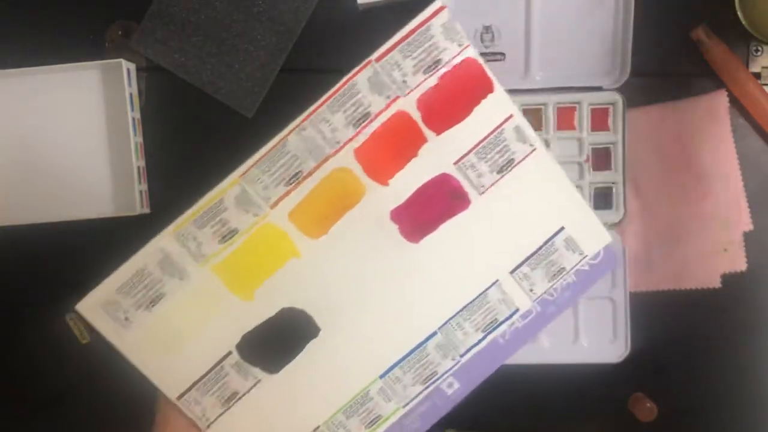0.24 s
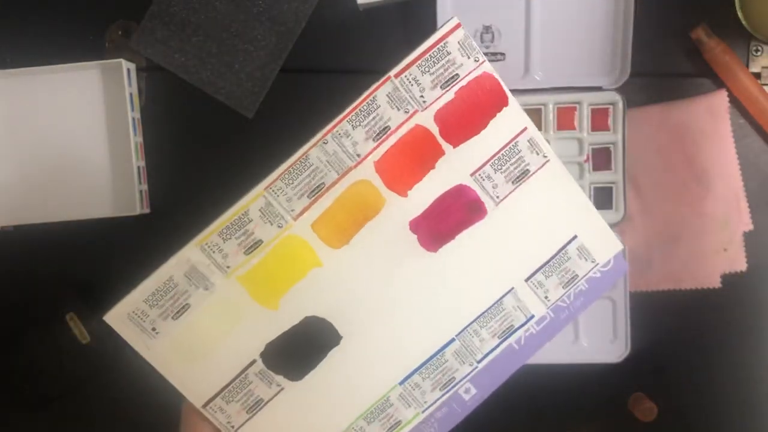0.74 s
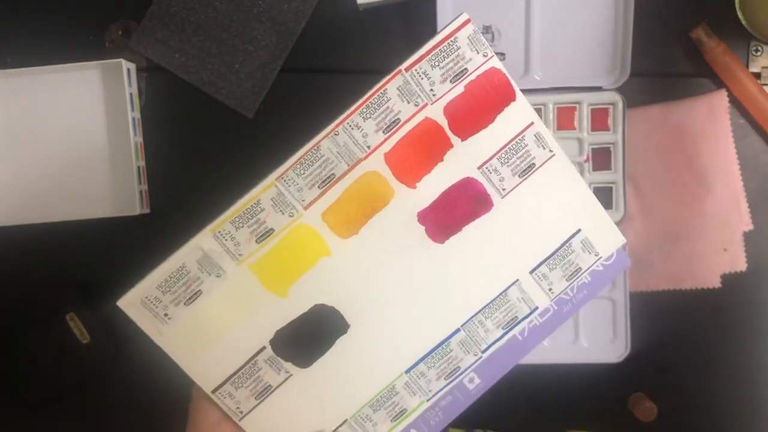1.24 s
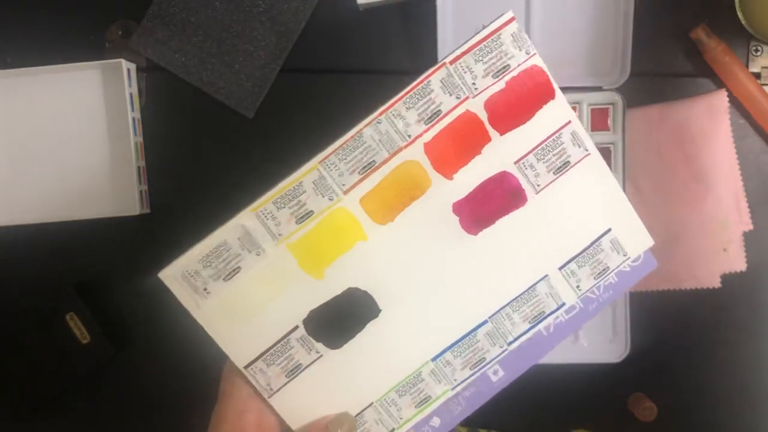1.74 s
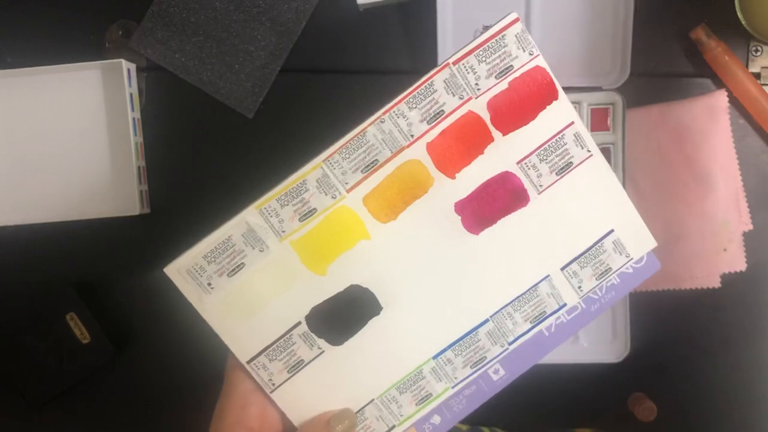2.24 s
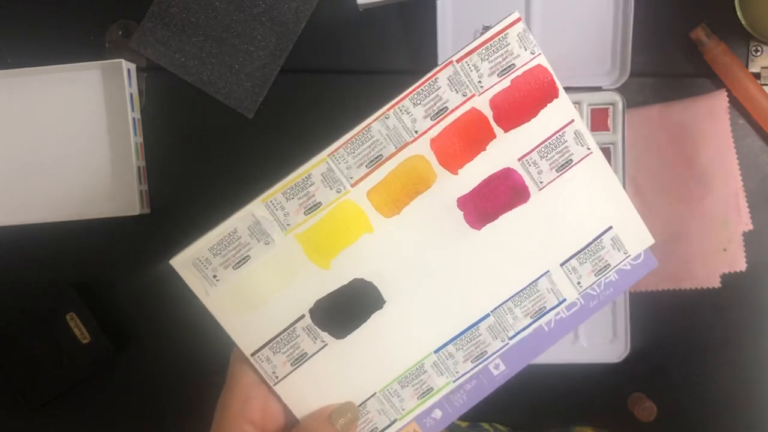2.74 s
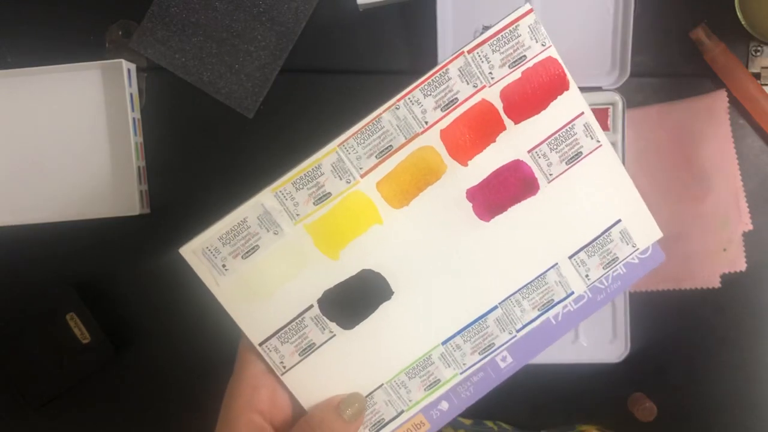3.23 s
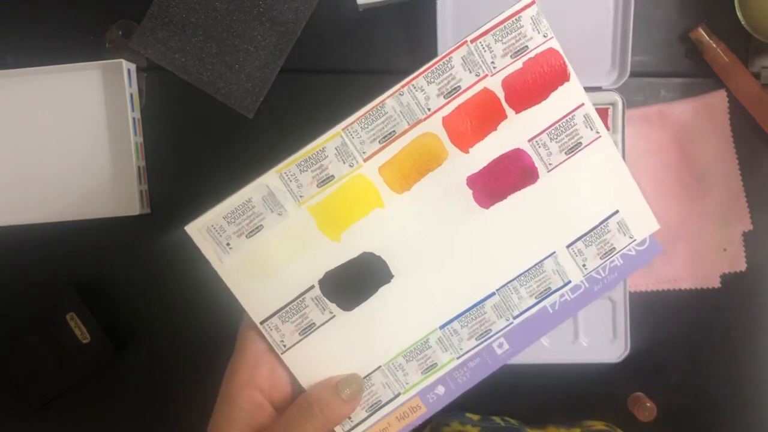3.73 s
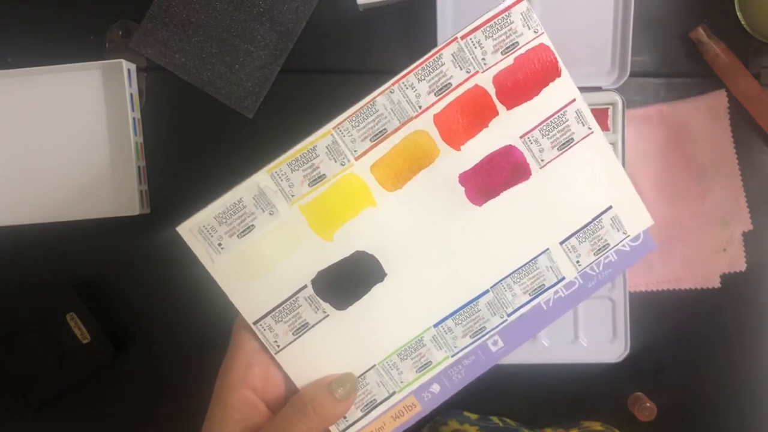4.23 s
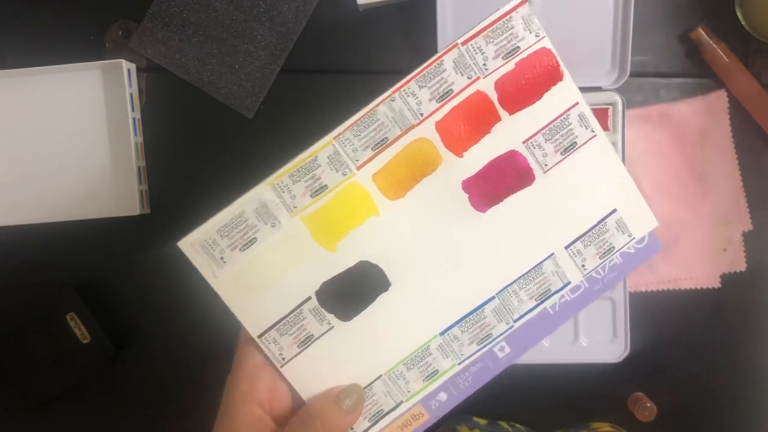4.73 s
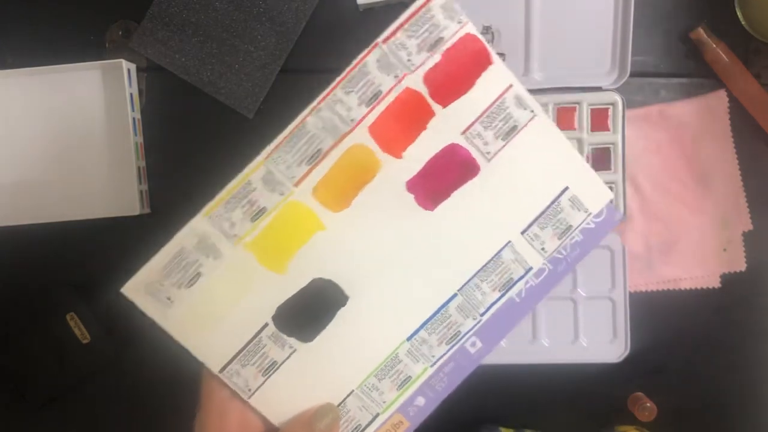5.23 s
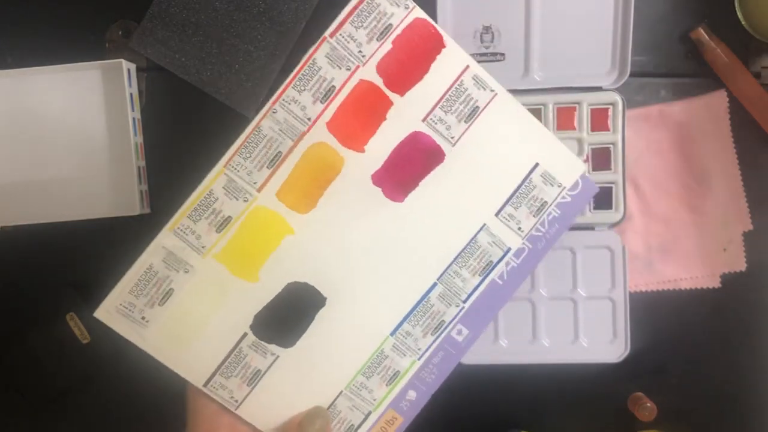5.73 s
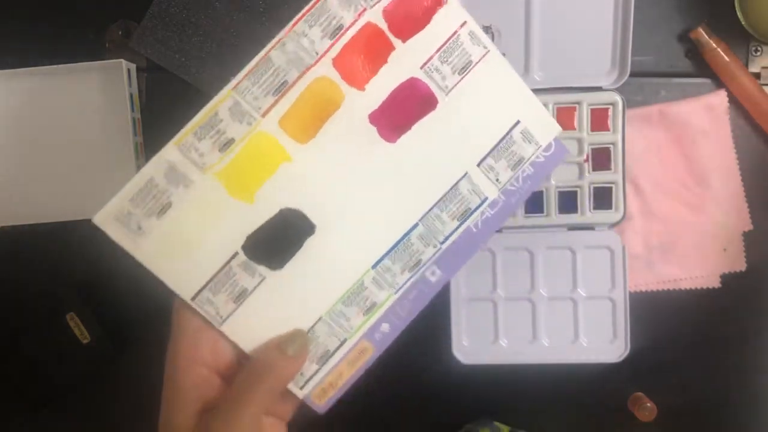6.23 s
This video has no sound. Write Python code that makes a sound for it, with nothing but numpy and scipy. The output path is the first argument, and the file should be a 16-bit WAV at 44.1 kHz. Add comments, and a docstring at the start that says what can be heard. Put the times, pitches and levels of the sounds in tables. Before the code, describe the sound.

Close up in a small, quiet room, a brush clinks sharply against a glass water jar, twice in quick succession. Gentle plips and little splashes carry on as it swirls in the water. Another clink rings out, then a further pair, and a brief bit of stirring dies away. Underneath are a low rumble, an appliance hum and the very faint rustle of a hand-held card.

```python
"""Bright glass clinks and small watery plips: a paintbrush is rinsed in a jar of water on a desk.
The ferrule strikes the glass, which rings and jolts the desk; the stirred water sheds small
ringing bubbles and spits fine ticks of spray. A sheet of card rustles faintly in the other hand.
It all sits close up in a small quiet room, over a low rumble and hum."""
import sys
import numpy as np
from scipy import signal
from scipy.fft import rfft, irfft
from scipy.io import wavfile

SR = 44100
rng = np.random.default_rng(int(sys.argv[2]) if len(sys.argv) > 2 else 0)


def wrap_up_sound(samples):
    """Save the sound to the file named by the first command line argument, as 16-bit audio."""
    columns = np.atleast_2d(samples).T
    # keep every value between -1 and 1, then stretch to whole-number steps
    tamed = np.clip(columns, -1, 1)
    steps = np.round(tamed * 32767).astype(np.int16)
    wavfile.write(sys.argv[1], SR, steps)


N = 285194
TIME = np.arange(N) / SR
AGE = TIME[:SR]  # the first second of a sound

# The jar's ring; close pairs beat. Each row: pitch in Hz, decay (t60) in seconds,
# relative level in dB when struck on side 0, the same on side 1.
GLASS_MODES = [(3125, .42, -46, -30), (3152, .35, -22, -37), (3175, .30, -34, -54), (3205, .36, -27, -58),
               (4080, .28, -55, -60), (4240, .25, -56, -54), (4350, .28, -54, -60), (5148, .38, -66, -43),
               (5188, .44, -70, -41), (5480, .38, -41, -60), (5547, .28, -49, -60), (5645, .20, -56, -48),
               (5970, .06, -29, -32), (6037, .24, -54, -29), (6063, .34, -43, -37), (6125, .28, -48, -54),
               (6590, .25, -57, -55), (7590, .14, -52, -46), (7830, .02, -44, -13), (7875, .25, -60, -55),
               (9680, .16, -62, -45), (10121, .26, -68, -44), (10428, .32, -44, -62),
               (10480, .03, -29, -38), (11428, .28, -74, -43), (11618, .10, -45, -52),
               (12069, .24, -72, -36), (12440, .23, -44, -54), (13052, .18, -68, -32),
               (14240, .18, -55, -48), (15500, .2, -70, -44)]
# Ferrule hits. Each row: start in seconds, side 0 or 1, ring gain in dB, favoured pitch in Hz,
# its lift in dB, treble gain in dB, crack gain in dB, thud gain in dB, thud centre in Hz.
FERRULE_HITS = [(0.4191, 0, -48.5, 3400, 17, -6, -54.5, -85.5, 300),
                (0.5978, 0, -2.5, 2970, 4, 4, -19, -43, 151), (0.9493, 0, -48, 5800, 21, 1, -58, -84, 300),
                (1.0704, 0, -4, 6260, 10.5, -6.5, -16, -25.5, 237),
                (2.768, 0, -40, 3200, 5, -4, -73, -79.5, 302),
                (3.1713, 0, -26.5, 6000, 18, 2.5, -23.5, -39.5, 157),
                (4.008, 1, 0, 7630, -2, 6, -14.5, -35, 358),
                (4.349, 1, -5, 6380, 10, -8, -23.5, -41.5, 150),
                (4.8031, 1, -33.5, 5170, 20, -11.5, -53, -88, 297)]
# The desk's ring. Each row: pitch in Hz, decay (t60) in seconds, relative level in dB.
WOOD_MODES = [(96, .5, -10), (142, .25, -13), (228, .14, -11), (285, .12, -4), (335, .14, -4),
              (395, .15, -1), (460, .12, -7), (610, .3, -9), (815, .14, -7), (1520, .45, -18),
              (1740, .12, -2)]
# The loudest bubbles. Each row: start in seconds, pitch in Hz, level in dB.
LOUD_BUBBLES = [(0.7266, 2040, -38), (0.7934, 2146, -40), (.8947, 2120, -39), (1.0528, 1784, -37),
                (1.158, 1583, -29.5), (1.3936, 5560, -43), (1.4564, 2600, -37), (1.5331, 632, -51),
                (1.7117, 1721, -36), (1.854, 3000, -42.5), (1.912, 5340, -40.5), (2.0758, 1914, -31.5),
                (2.2281, 1525, -34.5), (2.467, 1585, -33.5), (2.6398, 1695, -43), (2.796, 1660, -40.5),
                (2.869, 1510, -49), (2.9067, 1860, -41.5), (3.0005, 6260, -33), (3.0212, 1790, -42),
                (3.1418, 1630, -40.5), (3.1726, 1632, -29), (4.4845, 1680, -46), (4.7411, 2050, -39),
                (4.7578, 1540, -33.5), (4.824, 1430, -41), (4.8776, 1467, -36), (4.969, 5120, -39.5),
                (4.984, 1915, -40), (5.0559, 1910, -32), (5.3192, 1590, -44), (5.358, 3980, -40)]
# Bristles breaking the surface. Each row: start in seconds, relative level in dB.
BRISTLE_SPLASHES = [(0.7966, -51), (0.8823, -44), (0.8927, -45), (1.3924, -46), (1.4415, -43),
                    (1.4555, -51), (1.913, -43), (2.0733, -41), (2.1503, -44.5), (2.4616, -42.5),
                    (2.71, -46.5), (2.7649, -46.5), (4.7559, -42.5), (4.823, -37.5), (4.8787, -43),
                    (4.9683, -51.5), (5.0571, -39.5), (5.346, -45)]
# The sharpest spray. Each row: start in seconds, relative level in dB, centre in Hz.
SPRAY_TICKS = [(0.8827, -39, 10340), (1.488, -43, 11350), (2.0734, -36.5, 7310), (2.2298, -43.5, 14100),
               (2.336, -45, 13400), (2.3938, -47.5, 9100), (3.1351, -45, 8810), (3.978, -53.5, 7900),
               (4.8878, -41, 8400), (4.9853, -41.5, 9300), (5.055, -42.5, 8000)]
# Spells of stirring. Each row: start in seconds, end in seconds, base level of the fizz in dB.
STIR_SPELLS = [(0.722, 1.0, -47), (1.357, 2.04, -51), (2.059, 3.14, -47), (4.754, 5.14, -46.5),
               (5.279, 5.46, -42.5), (5.464, 5.68, -56)]
# The card shifting in the hand. Each row: middle in seconds, length in seconds, level in dB.
CARD_SHIFTS = [(0.082, 1, -64), (2.13, 0.9, -65), (3.783, 0.16, -70), (5.803, .15, -66.5)]
# Taps and scuffs of the card. Each row: start in seconds, length in seconds, level in dB,
# centre in Hz, width in octaves.
CARD_SCUFFS = [(0.037, 0.012, -55.5, 447, 3), (2.042, 0.21, -72.5, 930, 0.25), (5.686, 0.2, -70, 4380, 1.8),
               (6.439, 0.071, -44.5, 8700, 0.15)]
# An appliance's drone. Each row: centre in Hz, width in Hz, level in dB.
HUM_BANDS = [(53.7, 21, -59.5), (91.6, 3.6, -62.5), (122, 5.6, -66.5)]
# EQ curves for the noise layers. Each row: frequency in Hz, relative level in dB.
CRACK_EQ = [(300, -35.5), (1200, -25), (2000, -9), (2900, 5), (4500, 0.5), (6500, 0), (9000, -2.5),
            (12000, -5.5), (15500, -5.5), (17000, -20.5)]  # metal meeting glass
THUD_EQ = [(40, -11), (95, 3.5), (180, -4), (330, -1), (500, -1), (650, -2), (1100, -8), (1700, -12.5),
           (3000, -24.5), (8000, -56)]  # the jolted desk
SPLASH_EQ = [(700, -18.5), (1500, -4), (2600, 2.5), (4200, -1.5), (6000, -13.5), (9000, -25), (16000, -29)]  # the water's surface
RUSTLE_EQ = [(150, -0.5), (400, 2.5), (850, -1), (1400, -9), (4000, -17.5), (8000, -35.5), (16000, -33)]  # the sheet of card
AIR_EQ = [(15, -36), (25, -15.5), (70, -4.5), (105, -4.5), (137, -5.5), (195, -13), (344, -17), (531, -25),
          (818, -24.5), (1260, -37.5), (2760, -34), (3160, -35), (11900, -45.5), (14800, -42),
          (16000, -59.5)]  # the room's rumble


def clinks():
    """Each ferrule hit rings the glass, cracks and jolts the desk; the contact point picks the modes."""
    tones, blows = np.zeros((2, N))
    hz, t60, side0_db, side1_db = np.transpose(GLASS_MODES)
    treble_hz = 7000
    for start, side, ring_db, favoured_hz, lift_db, treble_db, crack_db, thud_db, thud_hz in FERRULE_HITS:
        mode_db = (side1_db if side else side0_db) + ring_db
        mode_db += lift_db * bump(hz, favoured_hz, octaves=.11) + treble_db * (hz > treble_hz)
        # the ring builds while the ferrule presses on the glass, then wavers as it fades
        add(tones, start, ring(hz, t60, mode_db, waver_hz=14) * (1 - fade(t60=.0089)))
        lift = lambda f: .6 * lift_db * bump(f, favoured_hz, octaves=.06)
        shelf = lambda f: 1.3 * treble_db * (f > treble_hz)
        crack = noise(lambda f: colour(CRACK_EQ)(f) + lift(f) + shelf(f), SR) * fade(t60=.017)
        add(blows, start, undb(crack_db) * crack + undb(thud_db) * desk_thud(thud_hz))
    return tones, blows


def desk_thud(centre_hz, lift_db=10):
    """The desk answers more slowly than the glass, with a woody ring and a dull puff of noise."""
    hz, t60, db = np.transpose(WOOD_MODES)
    wood = ring(hz, t60, db + lift_db * (bump(hz, centre_hz, octaves=.53) - 1))
    dull = noise(lambda f: colour(THUD_EQ)(f) + lift_db * bump(f, centre_hz, octaves=.34), SR)
    return (wood + undb(-3) * dull * fade(t60=.14)) * (1 - fade(t60=.076))


def water():
    """The loudest bubbles close with a faint splash; the bristles splash louder; spray ticks between them."""
    out = np.zeros(N)
    for start, hz, db in LOUD_BUBBLES:
        add(out, start, undb(db) * plip(hz))
        add(out, start, undb(db - 21) * splash())
    for start, db in BRISTLE_SPLASHES:
        add(out, start, undb(db - 2) * splash())
    for start, db, hz in SPRAY_TICKS:
        add(out, start, undb(db - 1) * tick(hz))
    return out


def bubble_trails(trail_db=-8, spread_db=4, low_hz=2000, high_hz=4600, trail_s=.028, count=4):
    """Each bristle splash sheds a short trail of tiny bubbles."""
    out = np.zeros(N)
    for start, db in BRISTLE_SPLASHES:
        for when, height, strength in rng.random((count, 3)):
            hz = low_hz * (high_hz / low_hz) ** height
            gain = undb(db + trail_db + spread_db * (2 * strength - 1))
            add(out, start + trail_s * when ** 2, gain * bubble(hz))
    return out


def stirring(low_hz=1644, high_hz=3900, fall_db_per_octave=3, spread_db=.5, spray_hz=9500, spray_db=-8.5):
    """The moving brush throws up a fizz of bubbles and droplets; low bubbles are commoner and louder."""
    out = np.zeros(N)
    for start, end, db in STIR_SPELLS:
        for when, height, strength in scatter(start, end, per_s=14):
            octaves = np.log2(high_hz / low_hz) * height ** 2
            cluster = plip(low_hz * 2 ** octaves, shed_db=-1)
            add(out, when, undb(db + spread_db * strength - fall_db_per_octave * octaves) * cluster)
        for when, height, strength in scatter(start, end, per_s=6.2):
            droplet = tick(spray_hz * 2 ** (height - .5))
            add(out, when, undb(db + spray_db + spread_db * strength) * droplet)
    return out


def plip(hz, shed_db=-8, count=3, within_s=.005, octaves_below=.2, octaves_above=.45):
    """A bubble and the few of nearly its size that form with it."""
    out = bubble(hz)
    for when, height in rng.random((count, 2)):
        octaves = (octaves_below + octaves_above) * height - octaves_below
        add(out, within_s * when, undb(shed_db) * bubble(hz * 2 ** octaves))
    return out


def bubble(hz, cycles=46, glide=.025, attack_s=.004):
    """A bubble rings for so many cycles, so small ones are short; its pitch lifts near the surface."""
    t60 = cycles / hz
    age = AGE[:int(2 * t60 * SR)]
    pitch = hz * (1 + glide * np.minimum(age / t60, 1))
    envelope = fade(t60) * (1 - fade(attack_s))
    return np.sin(2 * np.pi * np.cumsum(pitch) / SR) * envelope[:len(age)]


def splash(attack_s=.012):
    """A soft burst of noise as the surface opens and closes."""
    return noise(colour(SPLASH_EQ), SR) * fade(t60=.026) * (1 - fade(attack_s))


def tick(hz, attack_s=.002):
    """A droplet of spray snaps."""
    return noise(lambda f: 32 * bump(f, hz, octaves=.79), SR) * fade(t60=.0053) * (1 - fade(attack_s))


def jar_hollow(x, centre_hz=1850):
    """The air above the water rings on briefly after each drop."""
    cavity = noise(lambda f: 45 * bump(f, centre_hz, octaves=.54), SR) * fade(t60=.56)
    return with_tail(x, cavity, wet_db=-29)


def card(hold_db=-73.5):
    """The sheet never lies quite still: a soft rustle that swells as it shifts, with a tap and scuffs."""
    motion = np.zeros(N)
    for middle, length, db in CARD_SHIFTS:
        motion += undb(db) * np.cos(np.pi * np.clip((TIME - middle) / length, -.5, .5)) ** 2
    out = np.hypot(undb(hold_db), motion) * noise(colour(RUSTLE_EQ), N)
    for start, length, db, hz, octaves in CARD_SCUFFS:
        swell = np.hanning(int(length * SR))
        scuff = noise(lambda f: 22 * bump(f, hz, octaves), SR)[:len(swell)]
        add(out, start, undb(db) * swell * scuff)
    return out


def room(x, wet_db, split_hz=7000, predelay_s=.004):
    """A diffuse echo off the walls; the treble dies sooner."""
    low = signal.sosfilt(signal.butter(2, split_hz, fs=SR, output="sos"), rng.standard_normal(SR))
    high = signal.sosfilt(signal.butter(2, split_hz, "high", fs=SR, output="sos"), rng.standard_normal(SR))
    tail = low * fade(t60=.49) + 3.1 * high * fade(t60=.18)
    return with_tail(x, tail * (AGE > predelay_s), wet_db)


def room_tone(air_db=-60):
    """The bed: still room air and the wavering drone of an appliance."""
    drone = np.zeros(N)
    for hz, width, db in HUM_BANDS:
        drone += undb(db) * noise(lambda f: -20 * np.log10(1 + (2 * (f - hz) / width) ** 2), N)
    return drone + undb(air_db) * noise(colour(AIR_EQ), N)


def ring(pitches, decays, levels, waver_hz=0, wavers_per_s=110):
    """A sum of decaying modes, each drifting at random in pitch by about waver_hz."""
    out = np.zeros(SR)
    for hz, t60, db in zip(pitches, decays, levels):
        knots = rng.standard_normal(wavers_per_s + 1)
        drift = np.interp(AGE * wavers_per_s, np.arange(len(knots)), knots)
        phase = 2 * np.pi * np.cumsum(hz + waver_hz * drift) / SR
        out += undb(db) * np.sin(phase) * fade(t60)
    return out


def scatter(start, end, per_s, count=64):
    """Loosely spaced moments in a span, each with a pitch height 0 to 1 and a strength -1 to 1."""
    jitter, height, strength = rng.random((count, 3)).T
    times = start + (np.arange(count) + jitter) / per_s
    return np.transpose([times, height, 2 * strength - 1])[times < end]


def with_tail(x, tail, wet_db):
    """The dry sound plus its convolution with a tail of unit energy."""
    return x + undb(wet_db) * signal.fftconvolve(x, tail / np.linalg.norm(tail))[:N]


def noise(shape_db, size):
    """Noise of rms 1, shaped by an EQ curve."""
    hz = np.maximum(np.fft.rfftfreq(size, 1 / SR), 1)
    shaped = irfft(rfft(rng.standard_normal(size)) * undb(shape_db(hz)), size)
    return shaped / np.sqrt(np.mean(shaped ** 2))


def colour(points):
    """An EQ curve through (Hz, dB) points on a log-frequency axis."""
    hz, db = np.transpose(points)
    return lambda f: np.interp(np.log(f), np.log(hz), db)


def bump(f, hz, octaves):
    """A bell from 0 to 1 around a frequency."""
    return np.exp(-.5 * (np.log2(f / hz) / octaves) ** 2)


def fade(t60):
    """One second of decay, falling 60 dB every t60 seconds; 1 - fade makes an attack."""
    return np.exp(-np.log(1000) * AGE / t60)


def undb(db):
    """Decibels to gain."""
    return 10 ** (np.asarray(db) / 20)


def add(track, start_s, sound):
    """Mix a sound into the track at a time."""
    start = int(start_s * SR)
    track[start:start + len(sound)] += sound[:len(track) - start]


def scene():
    """Glass, knocks and water sit up front with a little room on each, over the card and the room tone."""
    tones, blows = clinks()
    glass = room(tones, wet_db=-9)
    knocks = room(blows, wet_db=-9.5)
    rinse = room(jar_hollow(water() + bubble_trails() + stirring()), wet_db=-8)
    return (glass + knocks + rinse + card() + room_tone())[None]


def record(dry, bass_hz=38, top_hz=16000):
    """A phone's microphone cuts the deepest bass and the very top."""
    bass_cut = signal.butter(6, bass_hz, "high", fs=SR, output="sos")
    top_cut = signal.ellip(8, .2, 70, top_hz, fs=SR, output="sos")
    return signal.sosfilt(top_cut, signal.sosfilt(bass_cut, dry))


dry = scene()
out = record(dry)
wrap_up_sound(out)
```